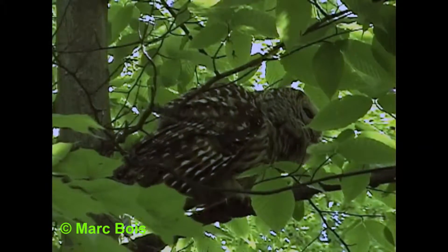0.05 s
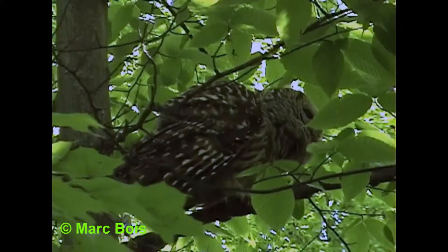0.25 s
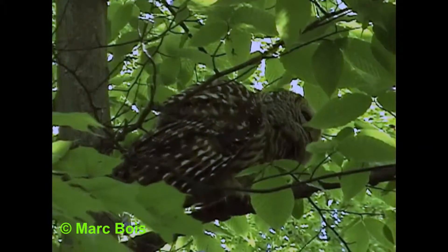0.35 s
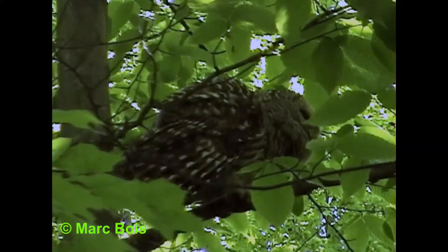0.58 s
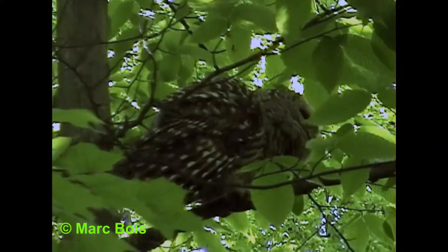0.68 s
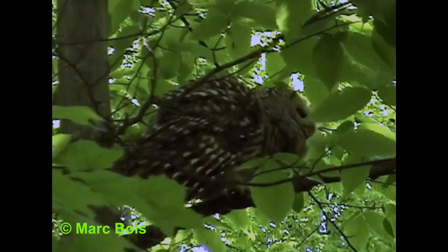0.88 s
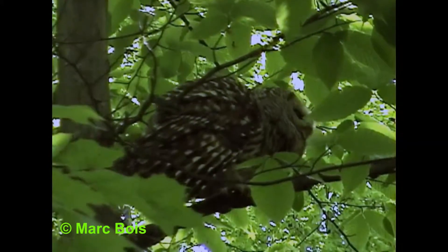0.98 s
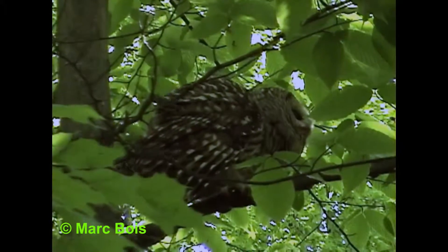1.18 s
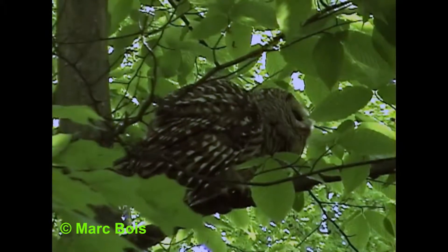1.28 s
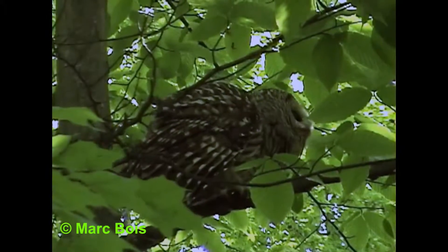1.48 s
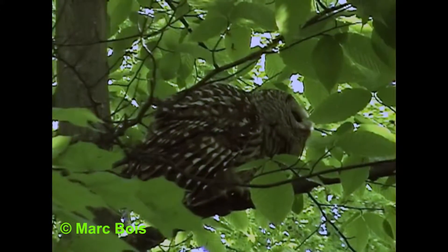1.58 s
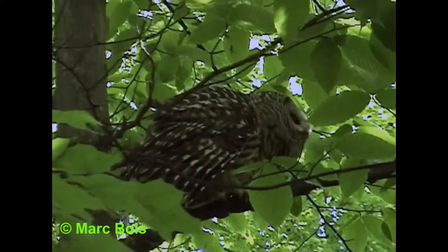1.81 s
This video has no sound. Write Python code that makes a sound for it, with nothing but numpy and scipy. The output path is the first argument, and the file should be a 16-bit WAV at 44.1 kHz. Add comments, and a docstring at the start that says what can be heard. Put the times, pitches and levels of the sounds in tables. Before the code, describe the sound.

Near a stereo microphone in a forest, an owl hoots twice, the second call falling into a rough gargle. As its echo fades, a quiet songbird whistles a quick phrase and another sings thin, high notes over soft hiss.

```python
"""A short hoot from an owl on a near branch, then a long one that swells, sinks and breaks into a low,
wavering gargle: a round tone with overtones shaped by the throat, rougher as the pitch drops.
Farther from the stereo microphone, one songbird whistles a quick, broken phrase, another sings two runs
of very high, thin notes, and a third is only a faint, distant blur of treble.
The forest echoes them all over a steady hiss and a low rumble."""
import sys
import numpy as np
from scipy import signal
from scipy.fft import rfft, irfft
from scipy.io import wavfile
from scipy.ndimage import uniform_filter1d

SR = 44100
rng = np.random.default_rng(int(sys.argv[2]) if len(sys.argv) > 2 else 0)


def unload_audio(sound):
    """Save the sound as a 16-bit wav file, at the path given as the first command line argument."""
    columns = np.transpose(np.atleast_2d(sound))
    # keep every value between -1 and 1, then stretch to whole-number steps
    steps = np.round(np.clip(columns, -1, 1) * 32767)
    wavfile.write(sys.argv[1], SR, steps.astype(np.int16))


N = 81585
T = np.arange(N) / SR
BIN_HZ = np.fft.rfftfreq(N, 1 / SR)


def undb(db):
    """Decibels to gain."""
    return 10 ** (np.asarray(db) / 20)


def unit(x):
    """Scale to an rms of 1."""
    return x / np.sqrt(np.mean(x ** 2))


def lookup(table, hz):
    """Read a table of f/Hz, value on a log-frequency axis."""
    f, value = np.array(table, float).T
    return np.interp(np.log(np.maximum(hz, 1)), np.log(f), value)


def colour(x, table):
    """Filter a sound by a table of f/Hz, level/dB."""
    return irfft(rfft(x) * undb(lookup(table, BIN_HZ)), N)


def wander(rate_hz):
    """Smooth random motion with an rms of 1."""
    hold = max(int(SR / rate_hz), 2)
    steps = rng.standard_normal(N)[np.arange(N) // hold]
    return unit(uniform_filter1d(uniform_filter1d(steps, hold), hold))


def pan(db):
    """Gains at the microphone for a level difference, left minus right."""
    return undb(np.array([[.5], [-.5]]) * db)


def gate(start, end, attack_s=.0074, decay_s=.0035):
    """Fully open by the start of a note, dying away after its end."""
    return np.clip((T - start) / attack_s + 1, 0, 1) * np.exp(-np.maximum(T - end, 0) / decay_s)


# Likeness of left and right at the microphone: f/Hz, correlation/0-1
LIKENESS = [(70, 1), (140, 0.6), (700, 0.56), (1500, 0.29), (10500, 0.22), (12500, 0.9)]

def diffuse_noise():
    """Noise from all around: the two sides are most alike in the bass and at the very top."""
    mid, side = rfft(rng.standard_normal((2, N)))
    like = lookup(LIKENESS, BIN_HZ)
    return irfft(mid * np.sqrt((1 + like) / 2) + np.array([[1], [-1]]) * side * np.sqrt((1 - like) / 2), N)


# Spectra of the air among the trees and of the far rumble: f/Hz, relative level/dB
HISS_SPECTRUM = [(100, -7), (300, -12), (560, -9), (900, -17.5), (1450, -16.5), (2300, -23), (3200, -20),
                 (4400, -27), (5500, -22), (8000, -26), (12000, -34), (13000, -46), (15000, -54)]
RUMBLE_SPECTRUM = [(15, -21), (57, 1.5), (100, 0.5), (135, -10.5), (250, -28), (1000, -74.5)]

def forest_air(hiss_db=-51, rumble_db=-55):
    """Steady hiss all round the microphone, over a distant rumble."""
    hiss = unit(colour(diffuse_noise(), HISS_SPECTRUM))
    rumble = unit(colour(diffuse_noise(), RUMBLE_SPECTRUM))
    return undb(hiss_db) * hiss + undb(rumble_db) * rumble


def forest_echo(x, early_db, late_db, early_t60_s=.45, late_t60_s=.79, gap_s=.014):
    """Quick scatter off near leaves and trunks, and the long echo from deep in the wood."""
    age = np.maximum(T - gap_s, 0)
    response = 0
    for db, t60 in ((early_db, early_t60_s), (late_db, late_t60_s)):
        tail = diffuse_noise() * (age > 0) * np.exp(-np.log(1000) * age / t60)
        response = response + undb(db) * unit(tail) / np.sqrt(N)
    return signal.fftconvolve(x, response, axes=1)[:, :N]


# Band of treble from a bird far off in the wood: f/Hz, relative level/dB
FAR_SONG_SPECTRUM = [(2400, -33), (3100, -9), (3700, 1.5), (4300, -11.5), (5000, -36)]

def far_bird(peak_s=1.22, spread_s=.54, peak_db=-62.5):
    """Only the echo of the most distant song reaches the microphone, swelling and fading."""
    swell = np.exp(-((T - peak_s) / spread_s) ** 2)
    return undb(peak_db) * swell * unit(colour(diffuse_noise(), FAR_SONG_SPECTRUM))


# Two runs of high notes, back among the trees: start t/s, top f/Hz, level/dB
THIN_NOTES = [(0.198, 8600, -56.5), (0.276, 7980, -54), (0.377, 8130, -55), (.458, 7830, -53.5),
              (.546, 7670, -55), (1.559, 9150, -59.5), (1.654, 8664, -58), (1.739, 8400, -54.5),
              (1.815, 8160, -52)]

def thin_bird(note_s=.055, scoop=.09, scoop_s=.02):
    """Some way off, a little left: each note scoops up towards its pitch, blurred by the trees."""
    song = 0
    waver = 1 + .02 * wander(500)
    for start, hz, db in THIN_NOTES:
        age = np.clip(T - start, 0, note_s)
        pitch = hz * waver * (1 - scoop * np.exp(-age / scoop_s))
        envelope = np.sqrt(np.abs(np.sin(np.pi * age / note_s)))
        song = song + undb(db) * envelope * np.sin(2 * np.pi * np.cumsum(pitch) / SR)
    direct = np.sqrt(2) * song * pan(db=2)
    return direct + forest_echo(direct, early_db=-1.5, late_db=0)


# Glides of the whistled phrase: start t/s, end t/s, first f/Hz, last f/Hz, level/dB
WHISTLE_GLIDES = [(1.283, 1.301, 3064, 3763, -48), (1.298, 1.339, 3706, 3893, -57),
                  (1.333, 1.37, 3260, 2960, -46.5), (1.371, 1.391, 2861, 2451, -48.5),
                  (1.411, 1.43, 3257, 3298, -46), (1.442, 1.461, 2827, 2536, -49.5)]

def whistling_bird():
    """Some way off, a little right: quick, slightly burry glides that run together in the echo."""
    song = 0
    burr = 1 + .01954 * wander(400)
    for start, end, from_hz, to_hz, db in WHISTLE_GLIDES:
        pitch = np.interp(T, [start, end], [from_hz, to_hz]) * burr
        song = song + undb(db) * gate(start, end) * np.sin(2 * np.pi * np.cumsum(pitch) / SR)
    direct = np.sqrt(2) * song * pan(db=-3)
    return direct + forest_echo(direct, early_db=-2, late_db=-1.5)


# Rasp in the owl's voice, heard at close range: f/Hz, relative level/dB
RASP_SPECTRUM = [(200, -41), (380, -8.5), (700, -10), (1200, 11), (1500, -15), (2300, -19.5), (3200, -37),
                 (8000, -58)]

def owl_note(contour, throat, jitter, rasp_db, shimmer=.18, rough_below_hz=382, clear_above_hz=490):
    """A round fundamental with overtones shaped by the throat; low pitches jitter and rasp once a cycle."""
    times, *columns = np.array(contour, float).T
    hz, fundamental_db, overtone_db = (uniform_filter1d(np.interp(T, times, c), 200) for c in columns)
    roughness = np.interp(hz, [rough_below_hz, clear_above_hz], [1, .12])
    phase = 2 * np.pi * np.cumsum(hz * (1 + jitter * roughness * wander(350))) / SR
    envelope = gate(times[0], times[-1])
    sounding = envelope > 1e-4
    harmonics = np.arange(2, 15)[:, None]
    weights = undb(lookup(throat, harmonics * hz[sounding]))
    weights /= np.linalg.norm(weights, axis=0)  # the throat sets timbre, not power
    overtones = np.zeros(N)
    overtones[sounding] = np.sum(weights * np.cos(harmonics * phase[sounding]), axis=0)
    voice = np.sqrt(2) * (undb(fundamental_db) * np.sin(phase) + undb(overtone_db) * overtones)
    rasp = unit(colour(rng.standard_normal(N) * (1 + np.cos(phase)), RASP_SPECTRUM))
    flutter = 1 + shimmer * roughness * wander(250)
    return envelope * (voice * flutter + undb(overtone_db + rasp_db) * roughness * rasp)


# The calls from the near branch: t/s, f/Hz, fundamental level/dB, overtone level/dB
SHORT_HOOT = [(0.058, 240.3, -58.5, -35.5), (0.072, 305.6, -37, -29), (0.086, 385.4, -29.5, -25.5),
              (0.1, 447.3, -26.5, -33.5), (0.118, 499.4, -23.5, -33.5), (0.135, 511, -27, -35),
              (0.154, 485.7, -25, -36), (0.167, 302.7, -35, -24.5), (0.182, 254.1, -57, -32),
              (0.203, 191.7, -51, -37)]
LONG_HOOT = [(0.27, 245, -52.5, -34.5), (0.287, 310.7, -39.5, -29), (0.301, 383, -30.5, -29.5),
             (0.317, 505.6, -26, -38), (0.341, 522.3, -27, -33.5), (0.363, 552, -20.5, -38.5),
             (0.397, 587.4, -16.5, -39.5), (0.426, 582.3, -17, -41), (0.459, 625.6, -17.5, -42.5),
             (0.482, 565.2, -20, -41.5), (0.511, 583, -18, -41), (0.534, 526.4, -20.5, -38),
             (0.574, 525.8, -26, -34.5), (0.592, 493.3, -29.5, -38.5), (0.63, 516.4, -20, -35),
             (0.656, 473.6, -30, -35.5), (0.695, 480, -24.5, -33.5), (0.706, 451.3, -38, -38)]
GARGLE = [(0.709, 344.8, -34.5, -23.5), (0.73, 353.8, -31.5, -24), (0.746, 388.4, -41, -29),
          (0.759, 376.5, -28.5, -26), (0.77, 337.4, -33.5, -27.5), (0.79, 324.3, -34, -26),
          (0.815, 348.4, -30.5, -21.5), (0.826, 303.3, -35.5, -28.5), (0.842, 304, -37.5, -27),
          (0.855, 327.8, -37.5, -25.5), (0.884, 316.9, -34, -29), (0.899, 274, -45.5, -31),
          (0.933, 294.3, -35.5, -28), (0.951, 257.2, -50, -33), (0.997, 251.7, -43, -33),
          (1.011, 226.6, -57, -39.5), (1.028, 204.6, -63, -34.5), (1.052, 191.6, -58, -44)]
# Resonances of the throat: f/Hz, relative level/dB
HOOT_THROAT = [(480, 4), (610, 16.5), (760, 4), (940, -3.5), (1070, -14.5), (1160, -26.5), (1420, -18.5),
               (1560, -12.5), (1760, -24.5), (2050, -19), (2330, -21.5), (2520, -32), (2950, -30),
               (3450, -38.5), (3750, -37.5), (4100, -38), (4600, -44.5), (7000, -59.5)]
GARGLE_THROAT = [(450, 0.5), (620, 7.5), (760, 1.5), (880, -7), (1070, -8.5), (1270, -19.5), (1520, -20.5),
                 (1850, -28), (2280, -22), (2750, -37), (4500, -41)]
# The owl's balance at the microphone: f/Hz, left minus right level/dB
OWL_BALANCE = [(500, 0.5), (1200, -3.5), (2400, -2), (4400, -1)]
# Colour the wood gives the owl's echo: f/Hz, gain/dB
OWL_ECHO_COLOUR = [(440, 0.5), (600, 4.5), (760, -1), (1080, 4), (1190, 8.5), (1300, 0.5)]

def owl(reflection_s=.0066, reflection_db=-6):
    """Close by, near centre: two hoots and a gargle, hollowed by a reflection off a nearby surface."""
    hoots = sum(owl_note(hoot, HOOT_THROAT, jitter=.035, rasp_db=-12) for hoot in (SHORT_HOOT, LONG_HOOT))
    call = hoots + owl_note(GARGLE, GARGLE_THROAT, jitter=.007, rasp_db=-25)
    reflection = undb(reflection_db) * np.interp(T - reflection_s, T, call, left=0)
    near = irfft(rfft(call + reflection) * pan(lookup(OWL_BALANCE, BIN_HZ)), N)
    return near + forest_echo(colour(near, OWL_ECHO_COLOUR), early_db=-15, late_db=-19, late_t60_s=2.22)


def scene():
    """The owl, the songbirds and the air, from one spot in the forest."""
    return owl() + whistling_bird() + thin_bird() + forest_air() + far_bird()


def record(dry, top_hz=15700):
    """The recorder behind the microphone cuts the top steeply."""
    return signal.sosfilt(signal.ellip(8, .2, 70, top_hz, fs=SR, output="sos"), dry)


dry = scene()
out = record(dry)
unload_audio(out)
```